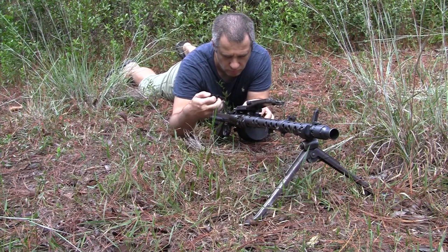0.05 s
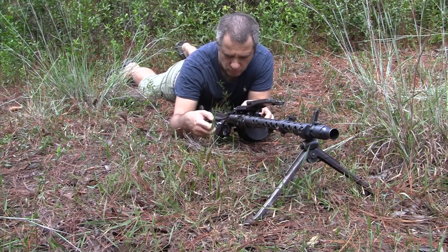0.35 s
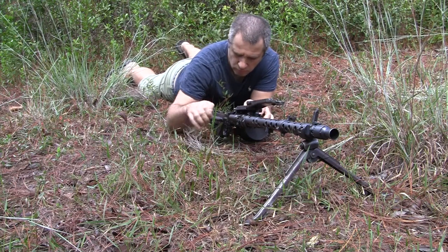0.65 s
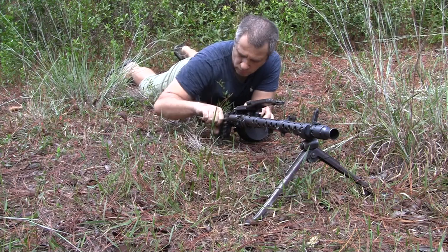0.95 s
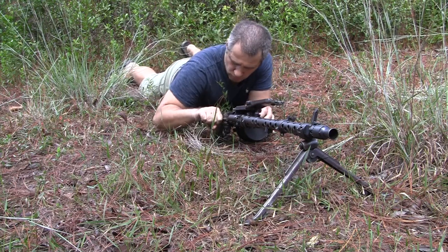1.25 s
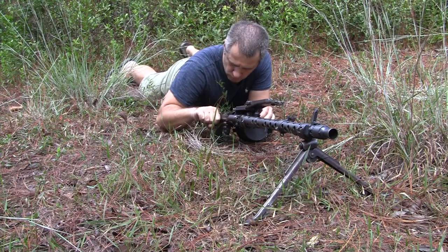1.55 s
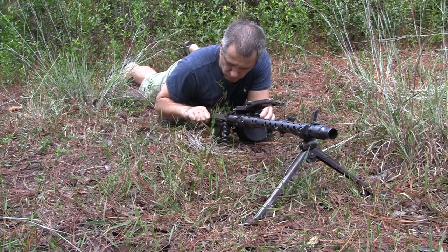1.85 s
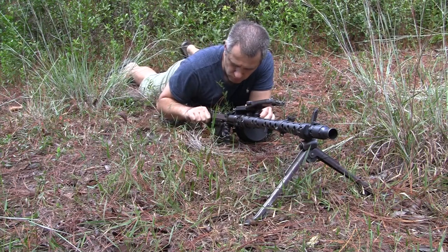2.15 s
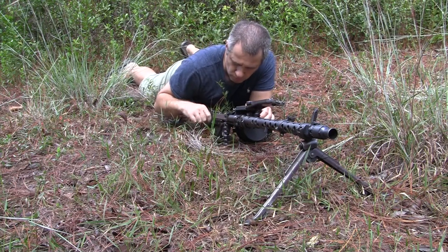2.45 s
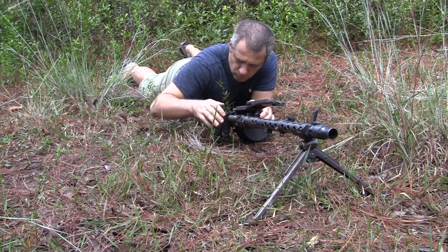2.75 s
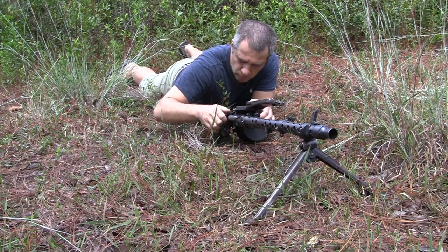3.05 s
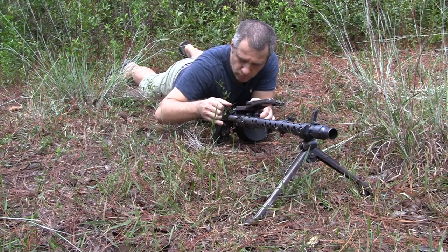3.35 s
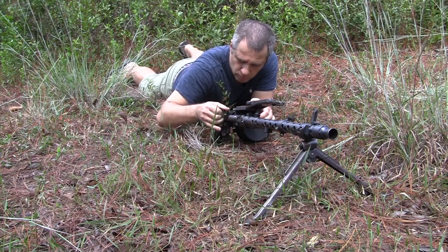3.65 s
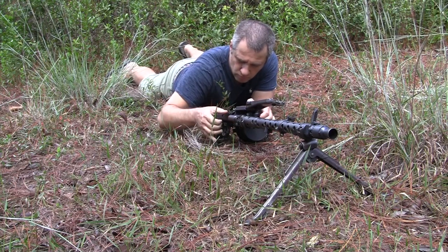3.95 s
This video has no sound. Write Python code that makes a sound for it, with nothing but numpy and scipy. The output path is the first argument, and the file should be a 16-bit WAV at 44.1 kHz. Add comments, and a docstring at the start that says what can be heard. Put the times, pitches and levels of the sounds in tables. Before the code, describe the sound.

Steel parts of a machine gun click, slide and slam home with a brief ring, then rattle softly after a pause. The gun is near the microphone, outdoors, over a buzzing cicada, distant insect hiss and low wind.

```python
"""A machine gun is handled on the ground at the edge of a wood: steel parts tick, slide and slam home.
Each contact sounds the receiver; hard blows set it ringing. Dry grass crackles under the arms.
A cicada buzzes with its two tymbals in a hiss of far insects, over low wind and a faint hum.
A gain control ducks at every hard clack and creeps back."""
import sys
import numpy as np
from scipy import signal
from scipy.fft import rfft, irfft
from scipy.io import wavfile
from scipy.ndimage import uniform_filter1d

SR = 44100
rng = np.random.default_rng(int(sys.argv[2]) if len(sys.argv) > 2 else 0)


def wrap_up_sound(samples):
    """Save the sound to the file named by the first command line argument, as 16-bit audio."""
    columns = np.atleast_2d(samples).T
    # keep every value between -1 and 1, then stretch to whole-number steps
    tamed = np.clip(columns, -1, 1)
    steps = np.round(tamed * 32767).astype(np.int16)
    wavfile.write(sys.argv[1], SR, steps)


N = 176400
T = np.arange(N) / SR
FREQS_HZ = np.maximum(np.arange(N // 2 + 1) * SR / N, 1)
LEFT_RIGHT = np.array([[1], [-1]])

# level of the low rush and hum, dipping briefly just after the loudest slam: (time [s], level [dB])
RUSH_HUM_ENVELOPE = [(0, -29), (.4, -28.5), (1.3, -24), (1.62, -23.5), (1.74, -35), (1.9, -28.5),
                     (2.201, -29), (3, -28), (4, -26.5)]


def from_db(db):
    return 10 ** (np.asarray(db) / 20)


def unit_rms(x):
    return x / np.sqrt(np.mean(x ** 2) + 1e-20)


def over_time(rows):
    """Each value column, interpolated per sample."""
    times_s, *columns = np.transpose(rows)
    return [np.interp(T, times_s, column) for column in columns]


def over_hz(rows):
    """Table interpolated per FFT bin, on log frequency."""
    hz, value = np.transpose(rows)
    return np.interp(np.log(FREQS_HZ), np.log(hz), value)


def colour(x, spectrum):
    """Filter by a (frequency [Hz], gain [dB]) curve."""
    return irfft(rfft(x) * from_db(over_hz(spectrum)), N)


def stereo(pair, correlation, balance):
    """Independent mid and side to left and right."""
    mid, side = rfft(pair)
    alike = np.clip(over_hz(correlation), -.99, .99)
    spectra = np.sqrt((1 + alike) / 2) * mid + LEFT_RIGHT * np.sqrt((1 - alike) / 2) * side
    return irfft(spectra * from_db(LEFT_RIGHT * over_hz(balance) / 2), N)


def resonate(x, hz, width_hz):
    """Two-pole resonance, peak gain 1."""
    r = np.exp(-np.pi * width_hz / SR)
    poles = [1, -2 * r * np.cos(2 * np.pi * hz / SR), r * r]
    return signal.lfilter(np.array([1, 0, -1]) * (1 - r * r) / 2, poles, x)


def damped_sine(t, hz, db, t60_s):
    return from_db(db - 60 * t / t60_s) * np.sin(2 * np.pi * hz * t)


def add(out, start_s, x):
    i = int(start_s * SR)
    out[..., i:i + x.shape[-1]] += x[..., :N - i]


def stroke(length_s):
    """Envelope: quick rise, slower fall, 0.25 s at most."""
    progress = np.clip(T[:SR // 4] / length_s, 0, 1)
    return np.sqrt(np.abs(np.sin(np.pi * np.sqrt(progress))))


def grains(per_s, spread_db):
    """0.25 s of random impulses of uneven size."""
    shape = (2, SR // 4)
    impulses = (rng.random(shape) < per_s / SR) * rng.choice([-1, 1], shape)
    return impulses * from_db(spread_db * rng.standard_normal(shape))


def noise_bed(spectrum, envelope):
    """Two independent coloured noises under one level curve."""
    return unit_rms(colour(rng.standard_normal((2, N)), spectrum)) * from_db(over_time(envelope)[0])


def cicada(weak_tymbal=0.8, throb_depth=0.4, throb_turns=0.01, scatter_gain=3.5, scatter_s=0.006):
    """Two tymbals buckle in turn, swayed by a fast throb; leaves scatter the buzz."""
    # (time [s], beat of each tymbal [Hz], throb [Hz])
    rates = [(0, 241.9, 96), (.5, 242.2, 95), (.9, 242.7, 94), (1.45, 242.9, 93), (2.3, 243.65, 88),
             (3.1, 243.85, 86), (4, 244.15, 84)]
    # body resonance: (frequency [Hz], gain [dB])
    body = [(3000, -25), (3650, -11), (4400, -5), (4870, -1), (5400, -1), (5700, -8), (6400, 0), (7600, 1),
            (8500, 0), (9200, -6), (9800, -13), (12000, -20)]
    # clear tones, swelling whine and steadier drone: (beat harmonic, throb sideband, level [dB])
    whine = [(22, 0, -4), (24, -1, -14), (24, 0, 0), (24, 1, -7), (29, 0, -11), (35, -1, -12)]
    drone = [(15, 0, -7), (17, 0, -10), (20, -1, -6), (20, 0, 0), (22, -1, -2), (22, 1, -4), (35, 1, -4)]
    # (time [s], level [dB])
    buzz_envelope = [(0, -32), (.6, -31), (1.4, -26.5), (2.1, -31.5), (2.9, -30.5), (3.4, -29.5),
                     (4, -28.5)]
    whine_envelope = [(0, -45), (.55, -38), (1.0, -33.5), (1.4, -29.5), (2.1, -45.5), (2.85, -36),
                      (3.3, -46), (3.45, -52), (4, -42)]
    drone_envelope = [(0, -44), (1.2, -37), (2.2, -38.5), (3, -40), (4, -40.5)]

    def tones(partials):
        return np.sqrt(2) * sum(from_db(db) * np.cos(2 * np.pi * np.cumsum(k * beat_hz + m * throb_hz)
                                                     / SR) for k, m, db in partials)

    def place(x, envelope, right_db):
        return x * from_db(over_time(envelope)[0] - LEFT_RIGHT * right_db / 2)

    beat_hz, throb_hz = over_time(rates)
    throb = np.sin(2 * np.pi * np.cumsum(throb_hz) / SR)
    turns = np.cumsum(beat_hz) / SR + throb_turns * throb
    pulses = sum((weak_tymbal if k % 2 else 1) * np.cos(2 * np.pi * k * turns) for k in range(12, 45))
    pulses *= np.exp(throb_depth * throb)
    leaves = rng.standard_normal((2, SR // 10)) * np.exp(-T[:SR // 10] / scatter_s)
    scattered = signal.fftconvolve(pulses[None], leaves, axes=1)[:, :N]
    buzz = unit_rms(colour(unit_rms(pulses) + scatter_gain * unit_rms(scattered), body))
    return (place(buzz, buzz_envelope, right_db=6)
            + place(tones(whine), whine_envelope, right_db=7)
            + place(tones(drone), drone_envelope, right_db=4))


def wind():
    """Low rush of moving air."""
    # (frequency [Hz], gain [dB])
    spectrum = [(20, -30), (35, -25), (55, -9), (80, -8.5), (150, 0), (220, -4.5), (350, -3), (650, -5.5),
                (950, -12), (1500, -20), (2600, -25.5), (6000, -47)]
    return noise_bed(spectrum, RUSH_HUM_ENVELOPE)


def far_insects():
    """A distant chorus merges into hiss; a lower band swells and fades half-way."""
    # (frequency [Hz], gain [dB])
    chorus_spectrum = [(1500, -28), (2700, -16), (3600, -7), (4800, -2), (6000, -1.5), (8000, 0),
                       (8800, -3.5), (9800, -9), (11500, -6.5), (13000, -14), (14500, -17), (16000, -50)]
    swell_spectrum = [(1500, -9.5), (2500, -7), (3200, 0), (4200, 4), (5500, -3), (7500, -2.5),
                      (10000, -16), (15000, -20)]
    # (time [s], level [dB])
    chorus_envelope = [(0, -27.5), (.6, -27.5), (1.4, -22), (2.204, -28.5), (3.2, -27), (3.6, -25.5),
                       (4, -25.5)]
    swell_envelope = [(0, -29.5), (.6, -28), (1.402, -25.5), (1.9, -27.5), (2.4, -39.5), (4, -50)]
    return noise_bed(chorus_spectrum, chorus_envelope) + noise_bed(swell_spectrum, swell_envelope)


def hum(waver_depth=0.21, waver_hz=2.8):
    """A low tone and its octave, wavering in level and phase."""
    # (frequency [Hz], level re the low rush [dB])
    partials = [(80.7, -13.5), (161.3, -7)]

    def waver():
        return unit_rms(irfft(rfft(rng.standard_normal(N)) / (1 + (FREQS_HZ / waver_hz) ** 2), N))

    out = np.zeros(N)
    for hz, db in partials:
        drift = 1 + waver_depth * (waver() + 1j * waver())
        out += from_db(db) * np.real(drift * np.exp(2j * np.pi * hz * T))
    return out * from_db(over_time(RUSH_HUM_ENVELOPE)[0])


def grass():
    """Dry grass under the arms: short runs of thin, bright crackles."""
    # (start [s], length [s], level before filtering [dB])
    rustles = [(0.044, 0.14, -34), (.0877, .012, -28), (0.187, 0.011, -17.5), (.19, 0.055, -27),
               (0.242, 0.14, -30), (.6858, .008, -24), (0.7117, 0.012, -14), (.712, .03, -25),
               (3.079, 0.024, -24)]
    # (frequency [Hz], gain [dB])
    spectrum = [(3000, -8), (8000, -12), (11000, -1.5), (13500, 2.5), (16000, -8)]
    out = np.zeros((2, N))
    for start_s, length_s, db in rustles:
        add(out, start_s, from_db(db) * unit_rms(grains(per_s=1500, spread_db=5)) * stroke(length_s))
    return colour(out, spectrum)


def receiver(force):
    """Broad resonances of the gun's steel, alternating in sign."""
    # (frequency [Hz], width [Hz], gain [dB])
    resonances = [(1205, 480, -4), (1757, 280, 5), (2540, 780, 3), (3300, 1280, 4), (4340, 1840, 1.5),
                  (5410, 660, 2.5), (7050, 1260, -5), (9500, 1200, -2.5), (12000, 1300, -4),
                  (14100, 1600, -5)]
    return sum((-1) ** k * from_db(db) * resonate(force, hz, width_hz)
               for k, (hz, width_hz, db) in enumerate(resonances))


def clicks(rise_s=0.00054, part_db=6, part_q=5.6, shelf_hz=6360, scatter_db=-21.5, scatter_s=0.013):
    """Steel parts meet: brief chatter sounds receiver and part; ground and brush scatter it."""
    # (time [s], level [dB], part pitch [Hz], treble re a 6.5 dB shelf [dB], decay [s]); the row at 1.826 s,
    # pitched at 13 kHz, is a thin, bright crackle of dry grass
    contacts = [(0.057, -26.5, 3070, 3, 0.0038), (0.089, -27, 2880, 2, 0.012),
                (0.2645, -15.5, 3060, -8, 0.0027), (0.275, -21, 3040, -6, 0.0045),
                (0.329, -23, 2920, -13, 0.0069), (0.574, -25, 2230, -2, 0.0015),
                (0.745, -4.5, 4920, -5.5, 0.0031), (0.7897, -17, 3430, -19, 0.0034),
                (0.858, -23, 2420, -6, .0025), (1.018, -28, 1670, -13, 0.0043),
                (1.2126, -8, 2650, -29, 0.0028), (1.22, -24, 2400, -16.5, 0.002),
                (1.295, -18, 2400, -15, 0.0049), (1.3074, -16, 2180, -7, 0.0048),
                (1.4886, 5.5, 3500, 15, .0011), (1.497, -9, 2350, -15, 0.0029),
                (1.6123, -16.5, 1840, -26, 0.0049), (1.63, -14.5, 1930, -21, 0.0033),
                (1.638, -12, 1910, -20, 0.0059), (1.65, -7, 4230, 0, 0.0059),
                (1.6639, 9.5, 6800, -13, 0.002), (1.7895, -14, 4060, -3, 0.0014),
                (1.826, -13, 13000, -4, 0.0009), (1.8368, -4, 4300, -6, 0.0034),
                (1.8395, -6.5, 3300, -22, 0.0034), (1.846, -14, 3370, -12, 0.0015),
                (3.1143, -26.5, 2320, -12, 0.002), (3.29, -27, 2430, 2, 0.014),
                (3.312, -25, 3570, 1, 0.019), (3.3516, -18, 3280, -16, 0.0025),
                (3.3557, -16.5, 2530, -14, 0.0028), (3.361, -21, 2900, -16, 0.0027),
                (3.369, -10, 2900, -10, 0.0016), (3.374, -17.5, 2770, -12, .0015),
                (3.3825, -15.5, 2700, -25, 0.0018), (3.387, -20.5, 2970, -20, 0.0022),
                (3.403, -20, 2370, -18, .002), (3.4167, -23, 2400, -10, 0.0018),
                (3.442, -25.5, 2210, -10, .002), (3.474, -20.5, 3360, -8, 0.0023),
                (3.4979, -14, 9500, 8, 0.0012), (3.5162, -21.5, 2370, 3, 0.002),
                (3.528, -25, 2230, 3, 0.0022), (3.534, -35, 2300, -1, 0.0013), (3.734, -33, 2100, 2, 0.004)]
    out, t = np.zeros((2, N)), T[:SR // 10]
    for start_s, db, part_hz, treble_db, decay_s in contacts:
        decay = np.exp(-t / decay_s) + from_db(scatter_db) * np.exp(-t / scatter_s)
        force = rng.standard_normal((2, len(t))) * decay * (1 - np.exp(-t / rise_s))
        steel = receiver(force)
        steel += from_db(part_db) * resonate(steel, part_hz, part_hz / part_q)
        low = signal.lfilter(*signal.butter(1, shelf_hz, fs=SR), steel)
        click = low + from_db(treble_db + 6.5) * (steel - low)
        onset_rms = np.sqrt(np.mean(click[:, :SR // 500] ** 2, axis=1, keepdims=True))
        add(out, start_s, from_db(db) * click / onset_rms)
    return out


def slides():
    """Steel on steel catches in dense, uneven grains that sound the receiver."""
    # (start [s], length [s], level [dB])
    strokes = [(0.256, 0.096, -31), (1.641, 0.022, -19), (1.667, 0.034, -5), (3.331, 0.12, -26.5),
               (3.419, 0.13, -31)]
    out = np.zeros((2, N))
    for start_s, length_s, db in strokes:
        catches = grains(per_s=11000, spread_db=3)
        scrape = receiver(catches) + 2 * resonate(catches, hz=3000, width_hz=2500)
        add(out, start_s, from_db(db) * unit_rms(scrape) * stroke(length_s))
    return out


def ringing(spread_db=2.0):
    """Hard blows ring the receiver's modes and knock the gun's body."""
    # (time [s], knock [dB], ring [dB])
    blows = [(0.744, -40, -3), (1.2165, -3, -22), (1.49, -26, -12), (1.6631, -5.5, 19.5),
             (1.8414, -12, -13), (3.3705, -32, -22)]
    # (frequency [Hz], level [dB], t60 [s])
    modes = [(2417, -37, .06), (3865, -36, .09), (5276, -31, .42), (6864, -39, .25), (8586, -29, .1),
             (10375, -21, .08), (13520, -34, .09)]
    out, t = np.zeros((2, N)), T[:SR // 2]
    rings = np.array([damped_sine(t, *mode) for mode in modes])
    shape = (2, len(modes))
    for start_s, knock_db, ring_db in blows:
        weights = from_db(ring_db + rng.normal(0, spread_db, shape)) * rng.choice([-1, 1], shape)
        add(out, start_s, weights @ rings)
        add(out[0], start_s, damped_sine(t, hz=894, db=knock_db, t60_s=0.013))
    return out


def latch():
    """A small steel catch is nudged, then snaps in; each hit rings briefly."""
    # (frequency [Hz], level [dB], t60 [s])
    modes = [(3278, 0, .014), (4441, -8, .013), (7106, -26, .04), (13320, -31, .085)]
    # (time [s], level [dB])
    hits = [(1.2145, -3), (1.4893, 9), (3.3695, -16), (3.383, -15)]
    out = np.zeros((2, N))
    ring = sum(damped_sine(T[:SR // 5], *mode) for mode in modes)
    for start_s, db in hits:
        add(out[0], start_s, from_db(db) * ring)
    return out


def scene():
    """The gun in front, the wood around it."""
    # (frequency [Hz], left-right correlation)
    gun_correlation = [(1000, 1), (3000, 0.94), (6000, 0.25), (12000, 0.36)]
    air_correlation = [(30, 0.76), (150, 0.78), (600, 0.8), (1500, 0.066), (3500, -0.21), (6000, -0.092),
                       (12000, -0.16)]
    # (frequency [Hz], left minus right [dB])
    gun_balance = [(1000, 0), (2500, 2.5), (5000, 1), (7000, 2.5), (9300, -4), (13000, -1.5)]
    air_balance = [(30, -1), (600, -2), (2000, -1), (4000, 2), (7000, -2.5), (9000, -1.5), (13000, -0.5)]
    handling = clicks() + slides() + ringing() + latch() + grass()  # rows: mid, side
    near = stereo(handling, gun_correlation, gun_balance) + cicada()
    air = wind() + far_insects()
    air[0] += hum()
    return near + stereo(air, air_correlation, air_balance)


def release(excess_db, decay_s):
    """Catch each peak and let it decay."""
    fade = np.exp(-T / decay_s)
    return np.maximum.accumulate(excess_db / fade) * fade


def record(dry):
    """Gain control with a quick and a slow release, clipping, steep low-pass."""
    threshold_db, detect_s, cutoff_hz = -8.5, 0.00095, 15900
    quick_s, slow_s, slow_share = 0.37, 10.8, 0.18
    power = uniform_filter1d(np.mean(dry ** 2, axis=0), int(detect_s * SR))
    excess_db = np.maximum(10 * np.log10(np.abs(power) + 1e-12) - threshold_db, 0)
    duck_db = (1 - slow_share) * release(excess_db, quick_s) + slow_share * release(excess_db, slow_s)
    clipped = np.clip(dry * from_db(-duck_db), -1, 1)
    return signal.sosfilt(signal.ellip(10, .2, 80, cutoff_hz, fs=SR, output="sos"), clipped)


dry = scene()
out = record(dry)
wrap_up_sound(out)
```